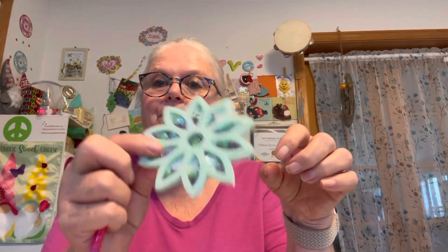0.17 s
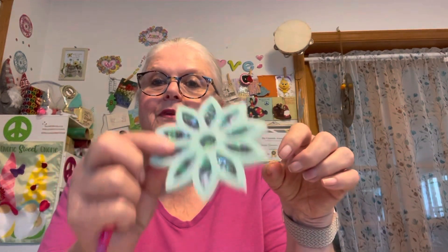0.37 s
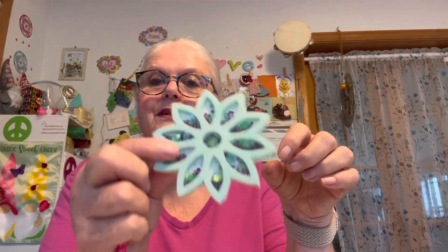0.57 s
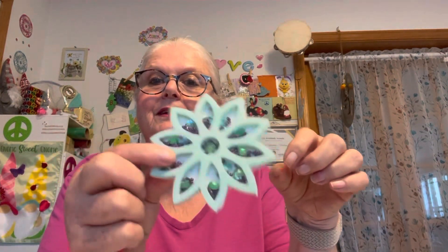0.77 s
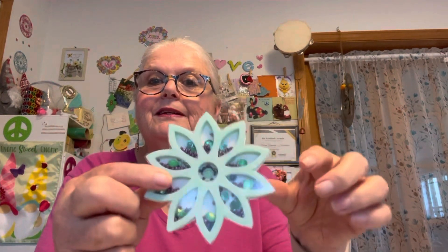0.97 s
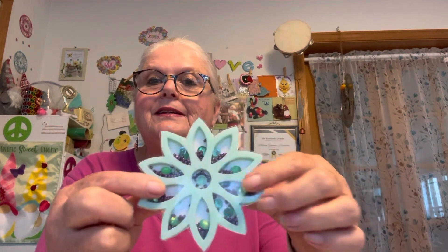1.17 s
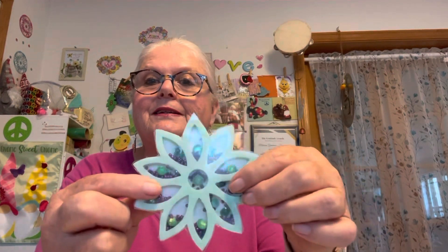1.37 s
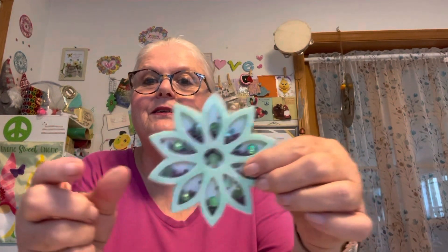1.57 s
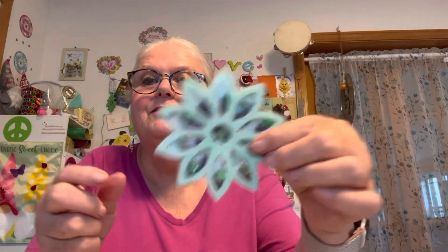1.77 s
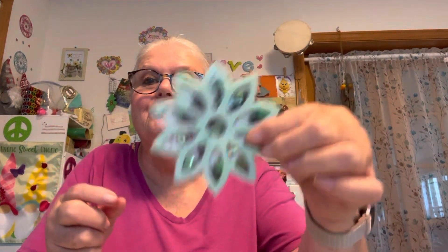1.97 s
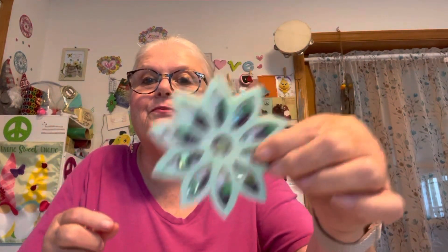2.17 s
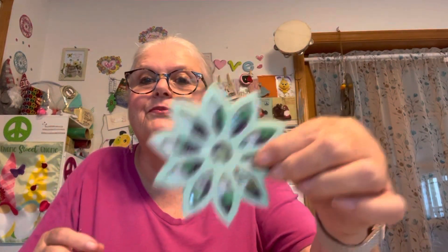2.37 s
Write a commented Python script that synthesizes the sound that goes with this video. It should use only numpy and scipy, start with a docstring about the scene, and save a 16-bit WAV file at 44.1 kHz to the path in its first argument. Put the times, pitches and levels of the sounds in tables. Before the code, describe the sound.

Small loose gems rattle in a flat plastic shaker, four quick shakes, a pause, four more

```python
"""Over a faint room rumble, loose gems rattle in the cells of a flat, flower-shaped craft shaker, close by.
Four shakes come first: each throws the gems into swarms of random tiny clicks, with single ticks on top,
all filtered by the resonances of the thin cover. The shaker then passes to one hand, with soft bumps
(sinking rough tones), finger rubs (grainy noise), a small snap (a damped sine) and stray ticks.
Four more shakes follow. Sparse reflections and a short tail surround the gems and the fingers."""
import sys
import numpy as np
from scipy import signal
from scipy.fft import rfft, irfft
from scipy.io import wavfile
from scipy.ndimage import uniform_filter1d

SR = 44100
rng = np.random.default_rng(int(sys.argv[2]) if len(sys.argv) > 2 else 0)


def transcribe(signal):
    """Save signal, clipped to [-1, 1], as a 16-bit WAV file at the path in sys.argv[1]."""
    frames = np.atleast_2d(signal).T
    limited = np.clip(frames, -1, 1)
    pcm = np.round(limited * 32767).astype(np.int16)
    wavfile.write(sys.argv[1], SR, pcm)


N = 106589  # length [samples]


def amp(db):
    """Logarithmic level: decibels to amplitude gain."""
    return 10 ** (np.asarray(db) / 20)


def unit(x):
    """Power normalisation: scales to rms 1, over all channels together."""
    return x / np.sqrt(np.mean(x ** 2) + 1e-20)


def read(points, hz):
    """Logarithmic pitch axis: interpolates a table over log frequency."""
    f, value = np.transpose(points)
    return np.interp(np.log(hz + 1), np.log(f + 1), value)


def add(mix, s, sound):
    """Superposition: adds a stereo sound to the mix at time s."""
    part = mix[:, max(round(s * SR), 0):][:, :sound.shape[1]]
    part += sound[:, :part.shape[1]]


def shaped(x, gain):
    """Linear filtering: multiplies the zero-padded spectrum by gain(frequency)."""
    hz = np.fft.rfftfreq(2 * N, 1 / SR)
    return irfft(rfft(x, 2 * N) * gain(hz))[..., :N]


def causal(gain):
    """Minimum phase: the Hilbert transform of log gain makes a filter ring only after a hit."""
    log_gain = np.log(np.maximum(gain, 1e-5))
    mirrored = np.r_[log_gain, log_gain[-2:0:-1]]
    return np.exp(np.conj(signal.hilbert(mirrored)))[:len(gain)]


# spectrum of the room rumble: (frequency [Hz], relative level [dB])
HUSH_SPECTRUM = [(15, -13), (25, -33), (33, -15), (46, 13), (62, -8.5), (90, -1), (130, -9.5), (250, -11),
                 (500, -20), (1000, -26), (3000, -34), (7000, -51.5), (15000, -35)]
HUSH_DB, HUSH_SIDE_DB = -70, -11  # middle level; side signal relative to the middle


def hush():
    """Interchannel coherence: a strong shared noise and a weak opposed one make a nearly central rumble."""
    noise = rng.standard_normal((2, N))
    mid, side = unit(shaped(noise, lambda hz: amp(read(HUSH_SPECTRUM, hz))))
    return amp(HUSH_DB) * (mid + amp(HUSH_SIDE_DB) * np.array([side, -side]))


# decay of the room's tail: (frequency [Hz], time to fall by 60 dB [s])
TAIL_T60 = [(200, 0.26), (1300, 0.1), (3500, 0.19), (9000, 0.16), (15000, 0.19)]
# colour of all reflections: (frequency [Hz], gain [dB])
REFLECTION_COLOUR = [(500, 7), (1200, 3), (2500, -1.5), (4500, 4.5), (7000, 5), (8500, -15), (15000, 11)]
EARLY_DB, EARLY_S = -10, .0014  # near reflections: level before the colour, amplitude decay
TAIL_DB = -11  # level before the colour
REFLECTIONS_PER_S = 3000


def room(x, size=22050):
    """Reverberation: sparse quick reflections from hands and body, then a furnished room's short tail."""
    t = np.arange(size) / SR
    signs = rng.choice([-1., 1.], (2, 2, size))
    near, far = signs * (rng.random((2, 2, size)) < REFLECTIONS_PER_S / SR)
    near = near * np.exp(-t / EARLY_S) * (t > .001)
    # the tail decays at its own rate in each frequency band
    hz, age, bands = signal.stft(far * (t > .005), SR, nperseg=256)
    decay = amp(-60 * age / read(TAIL_T60, hz)[:, None])
    tail = signal.istft(bands * decay, SR, nperseg=256)[1][:, :size]
    response = (amp(EARLY_DB) * unit(near) + amp(TAIL_DB) * unit(tail)) / np.sqrt(size)
    reflected = signal.fftconvolve(x, response, axes=1)[:, :N]
    return x + shaped(reflected, lambda hz: amp(read(REFLECTION_COLOUR, hz)))


# soft knocks of the shaker in the fingers:
# (centre time [s], level [dB], Gaussian length [s], pitch at the centre [Hz])
KNOCKS = [(0.423, -66, 0.023, 334), (0.465, -54.5, 0.021, 123), (0.638, -67, 0.015, 340),
          (0.842, -70.5, 0.024, 273), (1.079, -62, 0.017, 167), (1.115, -64, .012, 83.6),
          (1.333, -59, 0.016, 215.5), (1.406, -66.5, 0.021, 173.2), (1.83, -55, 0.01, 225.5),
          (2.019, -63.5, 0.015, 302), (2.302, -65.5, 0.014, 163)]
SAG_S, LOWEST_HZ, HIGHEST_HZ = 0.03475, 48.5, 395.7  # the pitch sinks as the fingers give, within limits
ROUGHNESS, FLUTTER_HZ = 2.2, 125  # strength and bandwidth of the random modulation


def bumps():
    """Random modulation: a sinking tone, roughened in amplitude and phase, makes each dull knock."""
    t, out = np.arange(N) / SR, np.zeros((2, N))
    white = rng.standard_normal((2, 2, N))
    noise = unit(shaped(white, lambda hz: 1 / (1 + (hz / FLUTTER_HZ) ** 2)))
    flutter = 1 + ROUGHNESS * (noise[0] + 1j * noise[1]) / np.sqrt(2)
    for s, db, length, pitch in KNOCKS:
        hz = np.clip(pitch * np.exp(np.minimum((s - t) / SAG_S, 10)), LOWEST_HZ, HIGHEST_HZ)
        cycles = np.cumsum(hz) / SR + rng.random()
        thud = (flutter * np.exp(2j * np.pi * cycles)).real
        out += amp(db) * unit(thud) * np.exp(-.5 * ((t - s) / length) ** 2)
    return out


# skin rubbing on the shaker: (centre time [s], level [dB], Gaussian length [s], centre frequency [Hz])
SKIN_RUBS = [(1.044, -66.5, 0.02, 2800), (1.081, -67, 0.01, 5870), (1.326, -58.5, 0.01, 1390),
             (1.382, -64, 0.026, 1600)]
RUB_OCTAVES, RUB_GRAIN = 1.0, 0.38  # half-width of the band at half amplitude; depth of the grain


def rubs():
    """Friction noise: irregularly modulated noise in a broad band, under a Gaussian envelope."""
    t, out = np.arange(N) / SR, np.zeros((2, N))
    for s, db, length, centre in SKIN_RUBS:
        white = rng.standard_normal((2, N))
        grain = unit(uniform_filter1d(rng.standard_normal(N), size=60))
        grains = white * np.exp(RUB_GRAIN * grain)
        rub = shaped(grains, lambda hz: 1 / (1 + (np.log2((hz + 1) / centre) / RUB_OCTAVES) ** 2))
        out += amp(db) * unit(rub) * np.exp(-.5 * ((t - s) / length) ** 2)
    return out


# fingertips catching on the cover:
# (start time [s], level [dB], pitch [Hz], decay [s]; the envelope peaks after half the decay)
FINGER_SNAPS = [(1.2638, -33, 2880, 0.0015)]


def snaps():
    """Damped oscillation: a sine swells and dies under a critically damped envelope."""
    t, out = np.arange(N) / SR, np.zeros((2, N))
    for s, db, pitch, decay in FINGER_SNAPS:
        envelope = 2 * t / decay * np.exp(-2 * t / decay)
        snap = amp(db) * envelope * np.sin(2 * np.pi * pitch * t)
        add(out, s, np.tile(snap, (2, 1)))
    return out


# broad colour of the shaker: (frequency [Hz], relative gain [dB])
SHAKER_COLOUR = [(100, -39.5), (250, -17.5), (410, -16.5), (620, -21.5), (850, -5), (1060, -4), (1700, 0),
                 (2700, 5.5), (3500, -1), (5000, -4.5), (6100, -4), (7200, -1.5), (9000, -8.5), (12000, -3),
                 (15500, -23)]
# resonances of the flower and its cover: (frequency [Hz], width [Hz], lift [dB])
COVER_MODES = [(403, 49, -11), (1105, 41, -7.5), (1671, 91, -7), (2290, 67, -7.5), (2710, 410, -12.5),
               (3984, 900, -14.5), (5760, 1050, -9.5)]


def shell(hz):
    """Modal resonance: the cover's modes add to a direct path, under the shaker's broad colour."""
    modes = sum(amp(db) / (1 + 2j * (hz - f) / width) for f, width, db in COVER_MODES)
    return causal(unit(amp(read(SHAKER_COLOUR, hz)) * abs(1 + modes)))


CRACK_S, CRACK_SPREAD = .00042, 0.1  # mean-log decay of a crack; its spread in nepers either way
PORT_LAG_S, LAG_SPREAD_S = 0.00017, .000016  # the left port hears the shaker later
PORT_UNLIKE = .42  # amount of crack noise that differs between the ports


def click(pitch, ring_db, ring_s, contact=0, size=448):
    """Impact: a very short crack excites a quick ring, which reaches the left port late."""
    t, hz = np.arange(size) / SR, np.fft.rfftfreq(size, 1 / SR)
    noise = rng.standard_normal((3, size))
    crack_s = CRACK_S * np.exp(CRACK_SPREAD * (2 * rng.random() - 1))
    cracks = noise * np.exp(-t / crack_s)
    ring = unit(np.sin(2 * np.pi * pitch * t) * np.exp(-t / ring_s))
    first_touch = unit(signal.unit_impulse(size))
    sound = unit(unit(cracks[0]) + contact * first_touch) + amp(ring_db) * ring
    # ten samples of room before the onset
    ports = rfft(np.roll(sound + PORT_UNLIKE * unit(cracks[1:]), 10, axis=1))
    lag = PORT_LAG_S + LAG_SPREAD_S * rng.standard_normal()
    ports[0] *= np.exp(-2j * np.pi * hz * lag)
    return unit(irfft(ports)) / np.sqrt(size)  # mean energy of 1 per port


# single gems striking a wall:
# (time [s], level before the common gain [dB], ring pitch [Hz], ring against crack [dB], ring decay [s])
SINGLE_GEMS = [(0.1175, -46.5, 3020, 15, 0.002), (0.127, -50, 2940, 5, .003),
               (0.155, -36.5, 1830, 18, 0.0026), (0.1645, -40, 5950, -7, .001),
               (0.168, -32.5, 2010, 12, 0.0018), (0.1803, -38, 2600, 19, 0.0022),
               (0.1982, -36, 1430, 10, .0013), (0.216, -53, 1890, 2, 0.0012),
               (0.3173, -39, 5960, 1, 0.0011), (0.3219, -41, 6000, 17, 0.0018),
               (0.343, -46, 1420, 13, 0.0022), (0.387, -38.5, 4010, 20, 0.0043),
               (0.413, -40, 1990, 22, 0.0034), (0.4262, -41, 1790, -11, 0.00099),
               (0.4635, -49, 2780, -6, 0.0011), (0.477, -54, 2510, -19, 0.00065),
               (0.5066, -49, 1770, -8, .001), (0.5263, -48, 3060, 18, 0.0022),
               (0.6277, -50, 5500, -7, .001), (0.6385, -49, 2900, 5, 0.0014), (0.657, -46, 5000, -5, .001),
               (0.6898, -48, 2750, 2, 0.00086), (0.7036, -43, 1830, -7, 0.0016),
               (0.7535, -42, 4000, 11, 0.0018), (0.7683, -32.5, 4750, 31, 0.00028),
               (0.8256, -29.5, 5800, 3, 0.00086), (0.8254, -32.5, 1850, 17, 0.002),
               (0.8734, -39, 2800, -7, 0.00089), (0.898, -47, 1040, 8, 0.0021),
               (0.916, -45, 2860, 6, .0007), (0.974, -51.5, 1780, 24, .0007),
               (0.982, -52, 1760, 12, 0.00071), (1.2312, -59.5, 5400, 4, 0.0004),
               (1.2787, -48.5, 3060, -5, 0.00093), (1.2857, -55, 2920, -10, .0006),
               (1.3809, -51.5, 3080, 9, .0006), (1.3919, -53, 2290, -5, .0006),
               (1.414, -56, 1740, -8, 0.0011), (1.4266, -50.5, 2800, 0, .0006),
               (1.4332, -56.5, 2800, 3, 0.00054), (1.4763, -57, 1870, 10, 0.0015),
               (1.4878, -44.5, 2830, -18, 0.0018), (1.5194, -44.5, 3740, -2, 0.0014),
               (1.5228, -60, 2200, 4, 0.0009), (1.5298, -39, 2940, 0, 0.00052),
               (1.5354, -42.5, 5760, 4, 0.00047), (1.544, -40.5, 3160, -6, 0.0011),
               (1.548, -44.5, 5900, -19, .0008), (1.5637, -45, 5600, -9, .001),
               (1.571, -44.5, 5800, -2, 0.00068), (1.6061, -41, 2130, -26, 0.0012),
               (1.615, -38.5, 5730, -3.5, 0.00046), (1.635, -45.5, 1480, -4, 0.0013),
               (1.6643, -43, 2500, 1.5, 0.0023), (1.671, -48, 2350, -10, 0.0015),
               (1.6956, -48, 1240, 1, 0.0016), (1.7117, -39.5, 2570, -3, 0.0013),
               (1.7414, -32, 1830, -3, 0.00043), (1.7463, -35, 4150, 6, 0.0023),
               (1.8028, -34, 6210, 7, 0.0012), (1.8075, -36.5, 1780, 0, 0.0011),
               (1.8674, -48, 1700, -16, 0.00077), (1.876, -48, 5510, 0, 0.00071),
               (1.9137, -48, 1440, 7, 0.0015), (1.9489, -41, 1730, -4, .0013),
               (2.011, -30, 2600, -3, 0.0011), (2.0185, -35, 1760, 13, 0.0017),
               (2.0435, -35.5, 2170, 1, 0.0011), (2.061, -40, 5570, -18, .0006),
               (2.082, -46, 2400, -6, .0008), (2.0986, -47, 1420, 6, 0.00079),
               (2.1258, -49, 1900, 6, 0.0014), (2.156, -41, 2780, -14, 0.00099),
               (2.191, -36, 2550, 1, 0.0015), (2.2687, -37, 4170, -13, 0.00097),
               (2.3149, -39.5, 2700, 8, 0.0016), (2.3223, -39, 4160, 11, 0.0023),
               (2.3917, -31, 5750, 3, 0.00064)]
TICK_GAIN_DB, CONTACT = 15.5, 1.6  # common gain; strength of the first touch
TICK_THIN_HZ = 1014  # single gems are too light to stir the shaker below this


def ticks():
    """Point excitation: single gems stand out of the rattle, each ringing the spot that it strikes."""
    out = np.zeros((2, N))
    for s, db, pitch, ring_db, ring_s in SINGLE_GEMS:
        add(out, s, amp(db + TICK_GAIN_DB) * click(pitch, ring_db, ring_s, CONTACT))
    return signal.lfilter(*signal.butter(4, TICK_THIN_HZ, "high", fs=SR), out)


# swarms of gems sliding or landing, levels before the filters; rise and fall span one neper:
# (peak time [s], level [dB], rise [s], fall [s], low body [dB])
GEM_SWARMS = [(0.013, -59.5, 0.015, 0.017, -25), (0.046, -50.5, 0.014, 0.036, -1.5),
              (0.153, -45, 0.02, 0.01, -2), (0.169, -37.5, 0.024, 0.042, -12.5),
              (0.204, -48, 0.01, 0.0081, -2), (0.219, -41, 0.011, 0.015, -1),
              (0.324, -50, 0.0024, 0.031, -15), (0.347, -40.5, 0.039, 0.036, -3),
              (0.42, -35, 0.035, 0.02, -6.5), (0.537, -49, 0.015, 0.03, 2.5),
              (0.573, -51.5, 0.038, 0.087, 5.5), (0.645, -34, 0.035, 0.0082, -8.5),
              (0.755, -48, 0.009, 0.036, -1), (0.768, -39, 0.0058, 0.025, -2.5),
              (0.83, -35.5, 0.017, 0.024, -5.5), (0.889, -54.5, 0.048, 0.039, 0),
              (1.546, -60.5, 0.022, 0.012, -13), (1.611, -47, 0.012, 0.0068, -10),
              (1.747, -40.5, 0.024, 0.042, -4), (1.808, -37.5, 0.019, 0.021, -5),
              (1.833, -40, 0.018, 0.0069, -2.5), (1.925, -46, 0.022, 0.027, 2),
              (1.962, -45, 0.04, 0.066, -2), (2.007, -38, 0.054, 0.012, -2.5),
              (2.023, -35, 0.021, 0.022, -7), (2.131, -44, 0.0087, 0.015, -8),
              (2.159, -40.5, 0.041, 0.046, -4.5), (2.204, -37.5, 0.016, 0.028, -1.5),
              (2.322, -41.5, 0.017, 0.057, -6), (2.358, -52, 0.017, 0.051, -12),
              (2.402, -39.5, 0.03, 0.087, -1.5)]
# gems still creeping between strokes, level before the filters: (time [s], level [dB])
CREEPING = [(0, -49.5), (.1, -65.5), (.28, -67), (.5, -81), (.72, -63), (.96, -63.5), (1.01, -76.5),
            (1.2, -87), (1.28, -64.5), (1.41, -74.5), (1.475, -74), (1.5, -54.5), (1.58, -61), (1.655, -58),
            (1.7, -53), (2.1, -74.5), (2.42, -41)]
CREEP_BODY_DB, BODY_HZ = -5, 3000  # low body of the creeping gems; a low body lies below this pitch
HITS_PER_S, BUSY_DB = 4800, -33.5  # collision rate at that level
CROWDING = .38  # the rate grows with the amplitude to this power
SIZE_SPREAD_DB = 3.3  # spread of strength between collisions
LOWEST_SPOT_HZ, HIGHEST_SPOT_HZ = 1376, 6450  # each collision briefly rings its own spot of the cover
RING_S, RING_DB = .0009, 0  # decay of that ring; its level against the crack
CLUMP_S, CLUMP_DB = .016, 4.2  # smoothing time and spread of each cell's share
BOOM_HZ, BOOM_DB, BOOM_GROWTH = 900, 7, 0.5  # a hard-thrown heap stirs the whole shaker below this pitch


def swarms(spots=64, cells=12):
    """Shot noise: the harder the gems are thrown, the more often and harder they collide, cell by cell."""
    t = np.arange(N) / SR
    power = amp(np.interp(t, *np.transpose(CREEPING))) ** 2
    low_power = power * amp(CREEP_BODY_DB) ** 2
    for s, db, rise, fall, body_db in GEM_SWARMS:
        nepers = np.where(t < s, ((s - t) / rise) ** 2, (t - s) / fall)
        surge = (amp(db) * np.exp(-np.minimum(nepers, 20))) ** 2
        power = power + surge
        low_power = low_power + surge * amp(body_db) ** 2

    force = np.sqrt(power) / amp(BUSY_DB)
    chance = HITS_PER_S / SR * force ** CROWDING  # of a collision in each sample
    sizes = unit(amp(SIZE_SPREAD_DB * np.clip(rng.standard_normal(N), -2, 2)))
    strength = sizes * rng.choice([-1, 1], N)
    hits = np.flatnonzero(rng.random(N) < chance)
    spot = rng.integers(0, spots, N)

    # the cells' shares wander while their mean power stays constant
    wander = unit(uniform_filter1d(rng.standard_normal((cells, N)), round(CLUMP_S * SR)))
    clumps = amp(CLUMP_DB * wander)
    clumps = clumps / np.sqrt(np.mean(clumps ** 2, axis=0))

    pitches = np.geomspace(LOWEST_SPOT_HZ, HIGHEST_SPOT_HZ, spots)
    clicks = [click(pitch, RING_DB, RING_S) for pitch in pitches]
    out = np.zeros((2, N))
    for i in hits:
        share = clumps[spot[i] * cells // spots, i]
        per_hit = np.sqrt(power[i] / chance[i])  # fewer collisions carry more power each
        add(out, t[i], strength[i] * share * per_hit * clicks[spot[i]])

    low = signal.lfilter(*signal.butter(1, BODY_HZ, fs=SR), out)
    out = out + (np.sqrt(low_power / power) - 1) * low
    boom = signal.sosfiltfilt(signal.butter(4, BOOM_HZ, fs=SR, output="sos"), out)
    return out + (amp(BOOM_DB) * force ** BOOM_GROWTH - 1) * boom


# level difference between the ports: (frequency [Hz], left minus right [dB])
PORT_LEAN = [(200, -1.5), (600, -11), (1100, -0.5), (1600, -2.5), (2800, -1), (4300, 0.5), (5200, 1.5),
             (6400, 5.5), (8000, -2.5), (15000, 0.5)]


def lean(x):
    """Interchannel level difference: each port takes half of it, with opposite sign."""
    return shaped(x, lambda hz: amp(np.outer([.5, -.5], read(PORT_LEAN, hz))))


def scene():
    """Superposition: the shaker and fingers in the room, with the bumps and the rumble added."""
    gems = shaped(swarms() + ticks(), shell)
    heard = lean(room(gems + rubs() + snaps()))
    return heard + bumps() + hush()


EDGE_HZ = 15700


def record(dry):
    """Band limitation: a linear-phase low-pass takes away the treble above the edge."""
    low_pass = signal.firwin(511, EDGE_HZ, window=("kaiser", 9), fs=SR)
    return signal.oaconvolve(dry, low_pass[None], "same")


dry = scene()
out = record(dry)
transcribe(out)
```